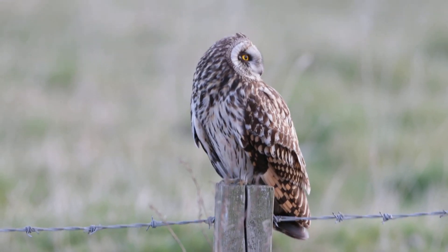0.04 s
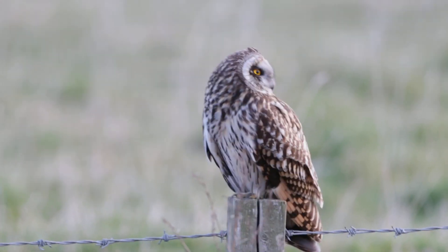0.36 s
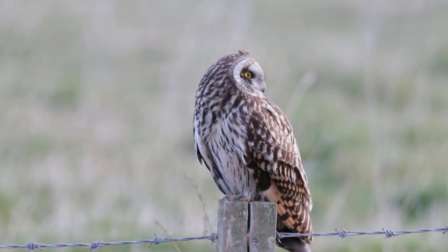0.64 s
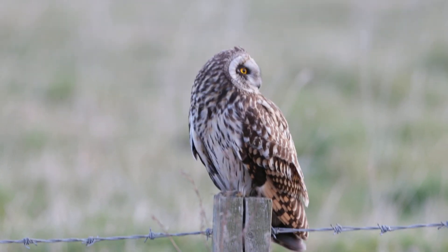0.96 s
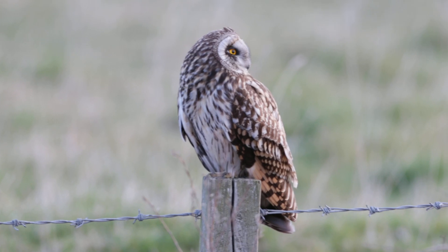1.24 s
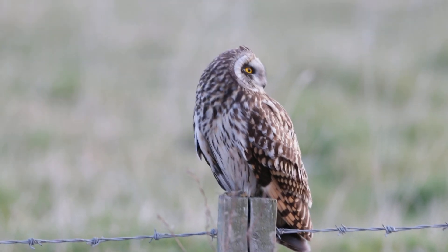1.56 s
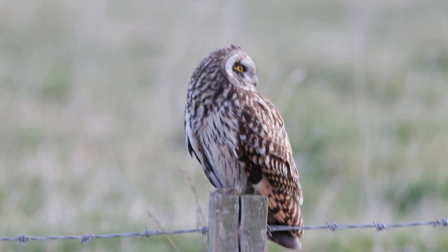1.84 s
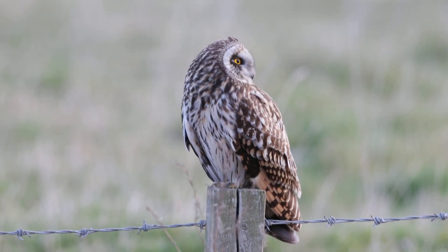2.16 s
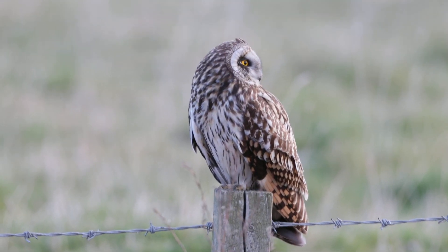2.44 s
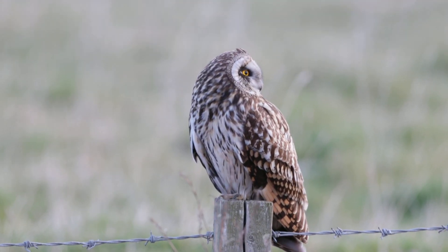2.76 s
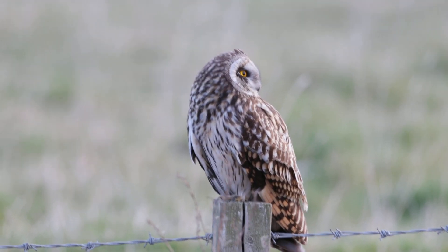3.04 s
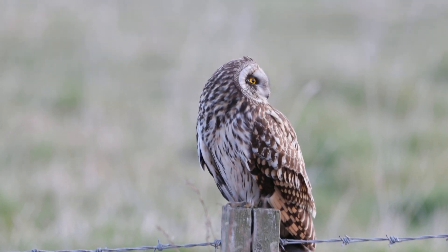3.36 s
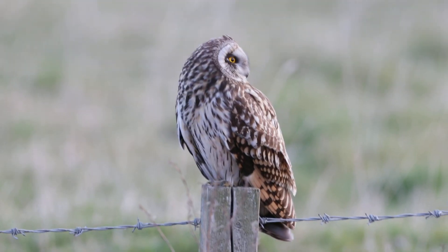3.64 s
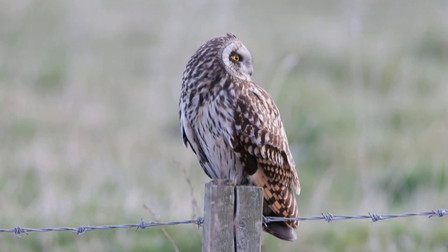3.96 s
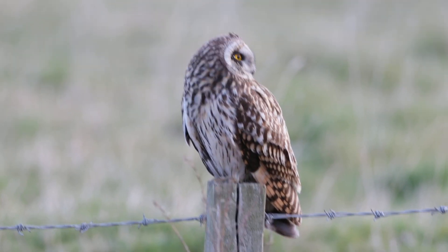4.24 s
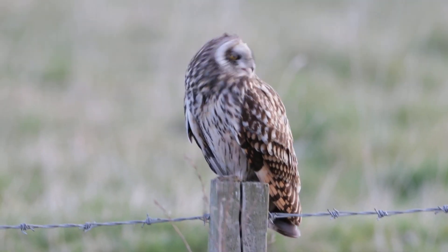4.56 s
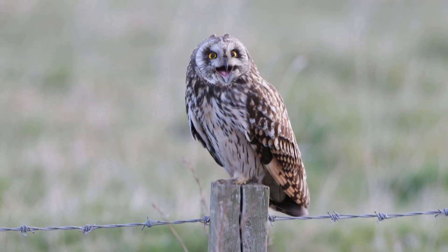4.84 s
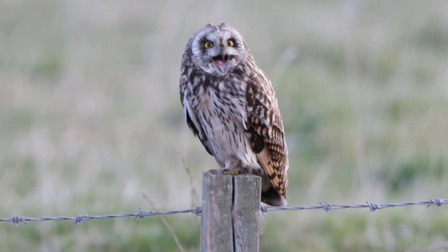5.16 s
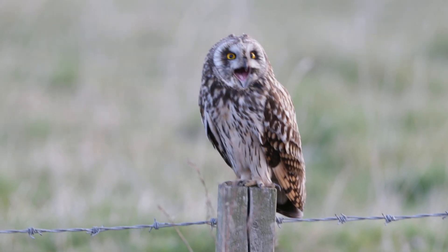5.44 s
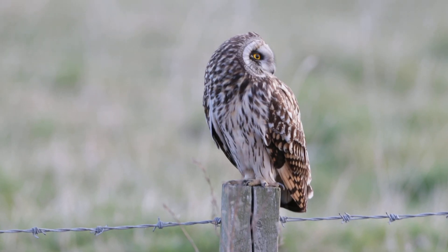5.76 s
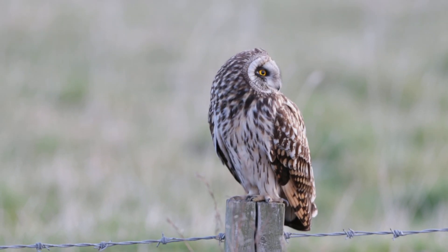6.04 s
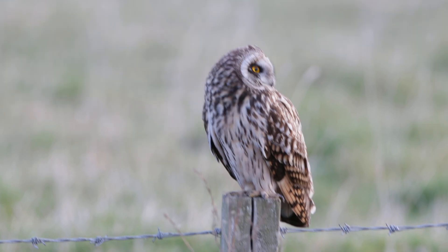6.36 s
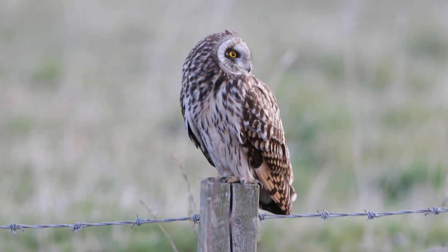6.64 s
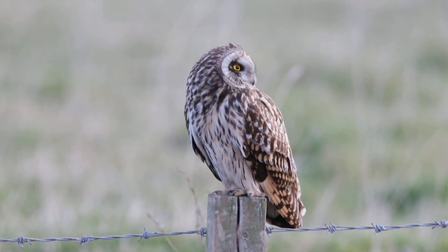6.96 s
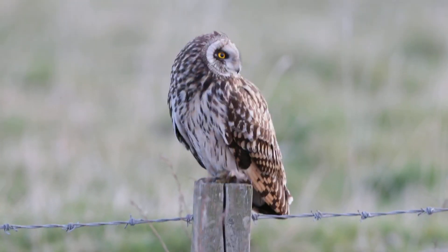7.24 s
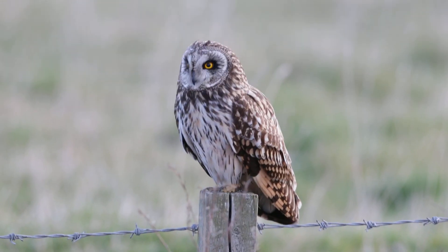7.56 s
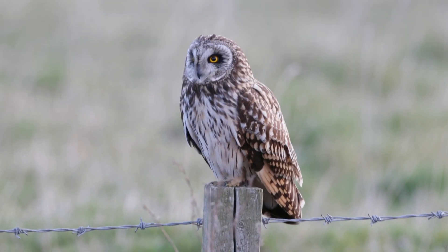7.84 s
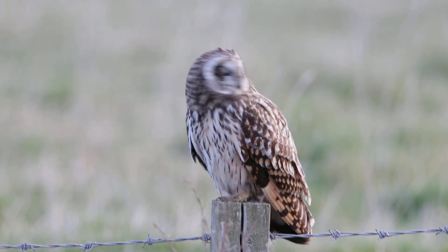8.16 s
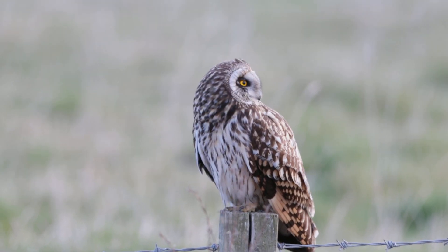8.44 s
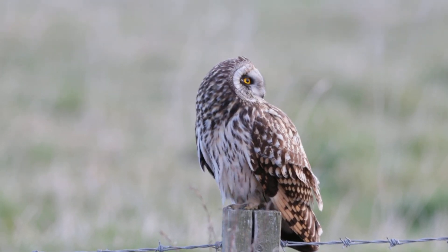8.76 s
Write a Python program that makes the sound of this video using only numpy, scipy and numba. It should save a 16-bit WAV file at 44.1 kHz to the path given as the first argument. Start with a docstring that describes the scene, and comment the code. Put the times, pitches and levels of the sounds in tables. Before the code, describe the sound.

An owl gives one harsh, rising screech outdoors over faint wind, steady hiss and a distant low rumble.

```python
"""A short-eared owl on a fence post in open grassland gives one harsh, rising screech.
Its syrinx, a self-sustained oscillator fluttering near 1.2 kHz, modulates the rushing air and excites
a rasp in the throat; the call clears to a squeal, then drops as the beak closes with a tick.
Behind it lie bands of noise: a far rumble, a steady hiss and light wind with a few soft buffets."""
import sys
import numpy as np
from scipy import signal
from scipy.fft import rfft, irfft, next_fast_len
from scipy.io import wavfile
from scipy.ndimage import uniform_filter1d
from numba import njit

SR = 44100
rng = np.random.default_rng(int(sys.argv[2]) if len(sys.argv) > 2 else 0)


def waveform_to_disk(signal):
    """Save audio, clipped to [-1, 1], as 16-bit WAV at the path in sys.argv[1]."""
    frames = np.transpose(np.atleast_2d(signal))
    scaled = np.clip(frames, -1, 1) * 32767
    samples = np.round(scaled).astype(np.int16)
    wavfile.write(sys.argv[1], SR, samples)


N = 392931
TIME = np.arange(N) / SR


def from_db(db):
    """Logarithmic level: 20 dB is a factor of ten in amplitude."""
    return 10 ** (np.asarray(db) / 20)


def rms_one(x):
    """Normalisation to unit mean power."""
    return x / np.sqrt(np.mean(x ** 2) + 1e-20)


def ramp(x, start, length):
    """Linear transition from 0 to 1."""
    return np.clip((x - start) / length, 0, 1)


def coloured(x, spectrum):
    """Spectral shaping by a curve of level against log frequency; rms 1."""
    hz, db = np.transpose(spectrum)
    size = next_fast_len(N)
    bin_hz = np.maximum(np.arange(size // 2 + 1) * SR / size, 1)
    gain = from_db(np.interp(np.log(bin_hz), np.log(hz), db))
    return rms_one(irfft(rfft(x, size) * gain, size)[:N])


def flutter(rate_hz):
    """Random modulation: noise low-passed at the given rate; rms 1."""
    lowpass = signal.butter(2, rate_hz, fs=SR, output="sos")
    return rms_one(signal.sosfilt(lowpass, rng.standard_normal(N)))


def evened(x, window_s):
    """Division by the running rms holds the level at 1 and keeps the fast grain."""
    power = np.abs(uniform_filter1d(x ** 2, int(window_s * SR)))
    return x / np.sqrt(power + 1e-9)


@njit
def two_pole(x, angle, r):
    """A driven, damped oscillator whose natural frequency may vary."""
    y = np.zeros(len(x))
    for i in range(2, len(x)):
        y[i] = x[i] - x[i - 2] + 2 * r * np.cos(angle[i]) * y[i - 1] - r * r * y[i - 2]
    return y


def resonate(x, hz, width_hz):
    """Resonance: two equal stages in series pass a steep-sided band; rms 1."""
    angle = 2 * np.pi * hz / SR * np.ones(N)
    r = np.exp(-np.pi * width_hz / SR)
    return rms_one(two_pole(two_pole(x, angle, r), angle, r))


def notch(x, hz, width_hz):
    """Antiresonance: subtracting a resonator's output cancels its band."""
    r = np.exp(-np.pi * width_hz / SR)
    cosine = np.cos(2 * np.pi * hz / SR) * (1 + r * r) / (2 * r)
    angle = np.arccos(np.clip(cosine, -1, 1)) * np.ones(N)
    return x - (1 - r * r) / 2 * two_pole(x, angle, r)


def swell(peak_s=8.22, width_s=.35):
    """A Gaussian envelope, 0-1, shared by rumble and breeze."""
    return np.exp(-((TIME - peak_s) / width_s) ** 2)


# Bands of the far rumble and faint drone: f/Hz, stage bandwidth/Hz, relative level/dB
RUMBLE_BANDS = [(46, 21, -67), (123.2, 20.5, -68), (192.3, 17, -76), (295.4, 4.3, -72.5), (489, 9.5, -75.5),
                (751, 92, -75), (917, 46, -74)]

def far_rumble(calm_db=-.64, swell_db=4.5):
    """Narrow-band noise: randomly excited resonances add and swell once together."""
    bands = sum(from_db(db) * resonate(rng.standard_normal(N), hz, width_hz)
                for hz, width_hz, db in RUMBLE_BANDS)
    return from_db(calm_db + swell_db * swell()) * bands


# Spectral density of the hiss: f/Hz, relative level/dB
HISS_SPECTRUM = [(880, 0), (1500, -5), (2630, -2), (8140, -4.5), (13600, -8.5), (15100, -8.5), (15700, -21)]

def hiss(level_db=-60.5):
    """Stationary broadband noise is heard as an even hiss."""
    return from_db(level_db) * coloured(rng.standard_normal(N), HISS_SPECTRUM)


# Spectral density of the breeze: f/Hz, relative level/dB
WIND_SPECTRUM = [(25, 0.5), (85, -4), (200, -1), (350, -1), (480, -4.5), (620, -8), (760, -7.5), (930, -8),
                 (1060, -12.5), (1300, -10.5), (2000, -17), (5000, -39)]

def breeze(calm_db=-59, swell_db=1, flicker_db=.7):
    """Turbulence in light wind gives low-pitched noise of fluctuating level."""
    level_db = calm_db + swell_db * swell() + flicker_db * flutter(7.5)
    return from_db(level_db) * coloured(rng.standard_normal(N), WIND_SPECTRUM)


# Soft buffets of wind: t/s, relative peak level/dB
WIND_BUFFETS = [(0.265, -45.5), (0.911, -47.5), (1.239, -49), (2.185, -46.5), (3.145, -48), (4.107, -45),
                (5.047, -47), (6.03, -46.5), (6.579, -47), (6.99, -46.5)]

def buffets(lead_s=.0077, rise_s=.02, gain_db=-9, band_hz=(170, 520)):
    """Transient gusts: dull noise rises quickly and decays exponentially."""
    envelope = np.zeros(N)
    for s, db in WIND_BUFFETS:
        age = np.maximum(TIME - s + lead_s, 0) / rise_s
        envelope += from_db(db + gain_db) * age * np.exp(1 - np.minimum(age, 50))
    dull = signal.butter(2, band_hz, "band", fs=SR, output="sos")
    return envelope * rms_one(signal.sosfilt(dull, rng.standard_normal(N)))


START_S, CLOSING_S, STOP_S = 4.795, 5.584, 5.614   # call begins, beak starts closing, call is cut off
HELD_HZ = 1182   # pitch of the plain, held screech

# Pitch set by the tension of the syrinx: t/s, f/Hz
TENSION_PITCH = [(4.86, 1076), (4.93, 1140), (5.03, 1182), (5.29, 1191), (5.42, 1257), (5.49, 1328),
                 (5.55, 1464)]

def owl(clears_from_hz=1350, clears_over_hz=105, valley_ratio=2.26):
    """Source and filter: as the owl pushes harder, rising tension raises and steadies the pitch."""
    tension_hz = np.interp(TIME, *np.transpose(TENSION_PITCH))
    effort = np.log2(tension_hz / HELD_HZ)   # octaves above the held screech
    pitch_hz = tension_hz * yelp()
    rough = .826 - 1.185 * effort
    clear = ramp(tension_hz, clears_from_hz, clears_over_hz)
    # each part: dB when held, plus dB per octave of effort
    voice_gain = from_db(-36.6 + 34 * effort)
    rasp_gain = from_db(-28.4 + 30 * np.minimum(effort, 0))
    air_gain = from_db(-30.3 + 27 * effort)
    phase, voice = syrinx(pitch_hz, rough)
    puffs = np.exp(.72 * np.cos(phase))   # air escapes once per cycle
    bursts = rough * flutter(550)   # the membranes flap in bursts a few milliseconds long
    noise = rasp_gain * throat(puffs, bursts, clear)
    noise += air_gain * closing_beak(rushing_air(puffs, bursts, rough))
    # while the call is hoarse, a valley lies just above the second harmonic
    hoarse = notch(noise, valley_ratio * pitch_hz, width_hz=280)
    noise = clear * noise + (1 - clear) * hoarse
    return mouth(voice_gain * voice + noise, pitch_hz) * call_envelope()


def call_envelope(attack_s=.022, release_db_per_s=1050):
    """Linear attack, hold and fast exponential decay."""
    release_db = -release_db_per_s * np.clip(TIME - STOP_S, 0, .2)
    return ramp(TIME, START_S, attack_s) * from_db(release_db)


# Resonances that colour the voiced harmonics: f/Hz, relative level/dB
VOICE_FORMANTS = [(750, -9), (1080, -4), (1450, 3), (1850, -2), (2250, 4), (2500, -2), (2900, 2),
                  (3600, -7.5), (4800, -24)]

def syrinx(pitch_hz, rough, waver=.026, jitter=.09, shimmer_db=3):
    """Self-sustained oscillation: unequal cycles smear the upper harmonics. Gives phase and voice."""
    unsteady = (1 + waver * rough * flutter(60.15)) * (1 + jitter * rough * flutter(602))
    phase = 2 * np.pi * np.cumsum(pitch_hz * unsteady) / SR
    voice = coloured(sum(np.cos(k * phase) for k in range(1, 5)), VOICE_FORMANTS)
    shimmer = from_db(shimmer_db * rough * flutter(197))
    return phase, evened(voice * shimmer, .02)


def throat(puffs, bursts, clear, rest_hz=3480, sinks_s=5.51, sink_hz_per_s=3400,
           burst_db=3.5, squeal_db=3, jitter=.074):
    """Forced resonance: puffs rasp in the throat; as the voice clears, a sinking tone squeals there."""
    sink_hz = sink_hz_per_s * (np.clip(TIME, sinks_s, STOP_S) - sinks_s)
    throat_hz = (rest_hz - sink_hz) * yelp()
    flapping = from_db(burst_db * bursts)
    ringing = resonate(puffs * rng.standard_normal(N), throat_hz, width_hz=900)
    rasp = evened(ringing * flapping, .03)
    phase = 2 * np.pi * np.cumsum(throat_hz * (1 + jitter * flutter(449.1))) / SR
    squeal = from_db(squeal_db) * evened(np.cos(phase) * flapping, .015)
    return np.sqrt(1 - clear) * rasp + np.sqrt(clear) * squeal


# Spectral density of the air leaving the beak: f/Hz, relative level/dB
AIR_SPECTRUM = [(400, -35), (950, -33), (1250, -7.5), (1550, -2.5), (2000, -5), (2700, -5), (3900, -7),
                (5000, 3.5), (7000, -2), (8100, 3.5), (9600, -1), (10600, -13), (12000, -24.5),
                (13700, -29), (14700, -46)]

def rushing_air(puffs, bursts, rough, burst_db=.5, crackle_db=4):
    """Amplitude modulation: bright flow noise is chopped into puffs of uneven strength."""
    strength = from_db(burst_db * bursts + crackle_db * rough ** 2 * flutter(1200))
    return evened(coloured(puffs * strength * rng.standard_normal(N), AIR_SPECTRUM), .018)


# Antiresonances of the open mouth at the held pitch: f/Hz, bandwidth/Hz
MOUTH_NOTCHES = [(1950, 260), (4340, 500), (5850, 91), (6700, 170), (10350, 290), (11750, 260)]

def mouth(call, pitch_hz, stretch=.1):
    """Antiresonances rise a little as the mouth tightens with the climbing pitch."""
    for hz, width_hz in MOUTH_NOTCHES:
        call = notch(call, hz * (pitch_hz / HELD_HZ) ** stretch, width_hz)
    return call


def yelp(octaves_at_stop=.34, deepest_octaves=.42, growth_s=.013):
    """Exponential glide: the frequency ratio by which pitch and throat fall into the stop."""
    fall_octaves = octaves_at_stop * np.exp(np.minimum((TIME - STOP_S) / growth_s, 2))
    return 2 ** -np.minimum(fall_octaves, deepest_octaves)


def closing_beak(air, closing_takes_s=.012, choke_db=6.5, open_hz=9800, closed_hz=5000, slide_s=.027):
    """Constriction: the closing beak chokes the air and slides a wide antiresonance down through it."""
    closed = ramp(TIME, CLOSING_S, closing_takes_s)
    hollow_hz = open_hz + (closed_hz - open_hz) * ramp(TIME, CLOSING_S, slide_s)
    hollowed = notch(air, hollow_hz, width_hz=3800)
    return from_db(-choke_db * closed) * (air + closed * (hollowed - air))


def beak_tick(at_s=5.62, level_db=-20.5, decay_s=.0006):
    """Impact: the beak shuts with a bright, heavily damped burst of noise."""
    decay = (TIME >= at_s) * np.exp(-np.clip((TIME - at_s) / decay_s, 0, 20))
    return from_db(level_db) * decay * resonate(rng.standard_normal(N), hz=8050, width_hz=1800)


def field(call, scatter_db=-36, t60_s=.23, cutoff_hz=4000):
    """Scattering from grass and fence adds a very faint, dull tail."""
    t = TIME[:SR // 2]
    dull = signal.butter(2, cutoff_hz, fs=SR, output="sos")
    tail = signal.sosfilt(dull, rng.standard_normal(len(t))) * from_db(-60 * t / t60_s)
    tail /= np.sqrt(np.sum(tail ** 2))
    return call + from_db(scatter_db) * signal.fftconvolve(call, tail)[:N]


def scene():
    """Superposition of background, wind and owl in one channel."""
    return (far_rumble() + hiss() + breeze() + buffets() + field(owl() + beak_tick()))[None]


def record(dry, low_hz=28, high_hz=15850):
    """Band limiting: the deepest bass rolls off and the top is cut steeply."""
    dry = signal.sosfilt(signal.butter(2, low_hz, "high", fs=SR, output="sos"), dry)
    return signal.sosfilt(signal.ellip(12, .1, 80, high_hz, fs=SR, output="sos"), dry)


dry = scene()
out = record(dry)
waveform_to_disk(out)
```